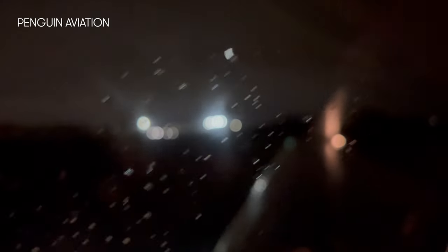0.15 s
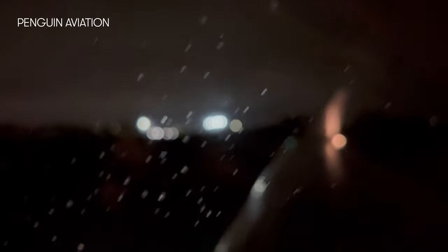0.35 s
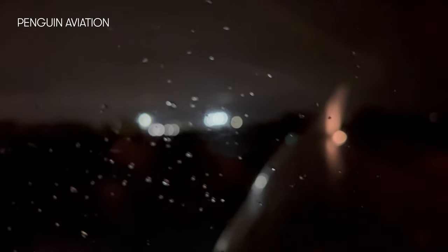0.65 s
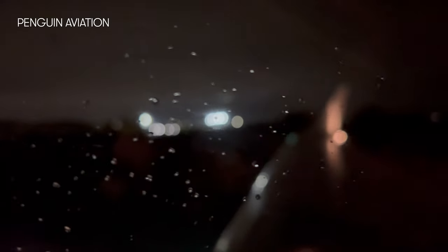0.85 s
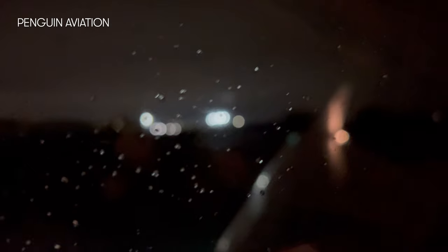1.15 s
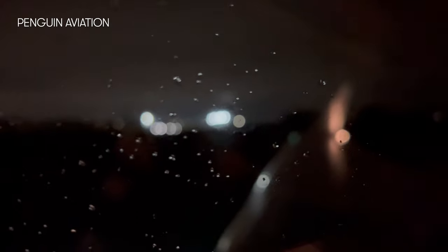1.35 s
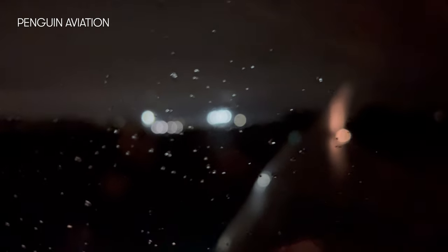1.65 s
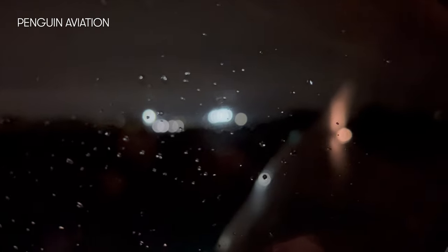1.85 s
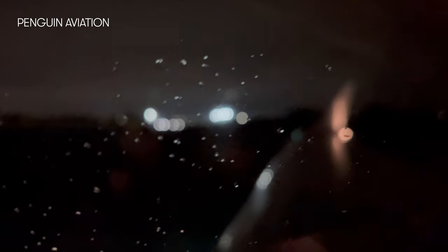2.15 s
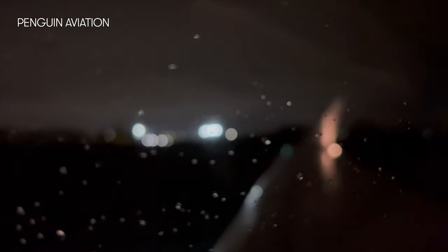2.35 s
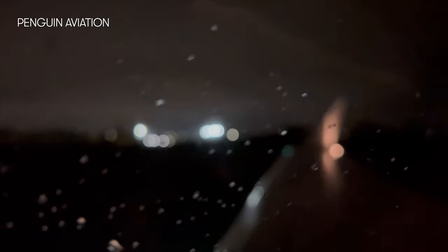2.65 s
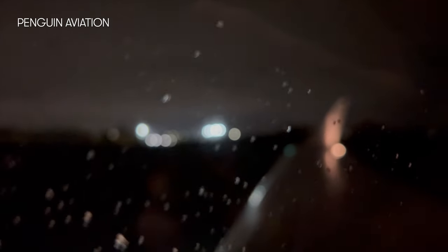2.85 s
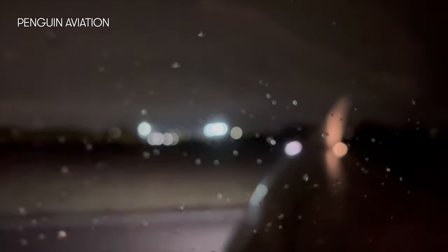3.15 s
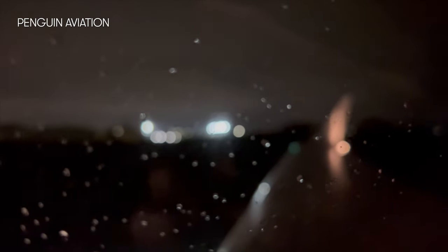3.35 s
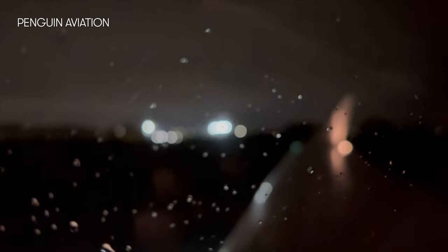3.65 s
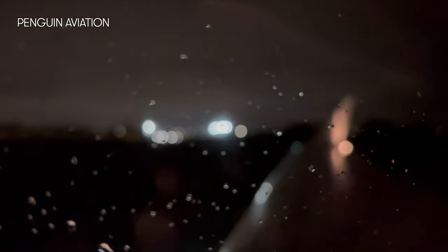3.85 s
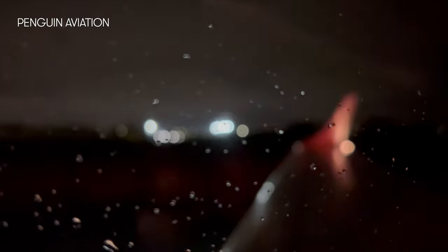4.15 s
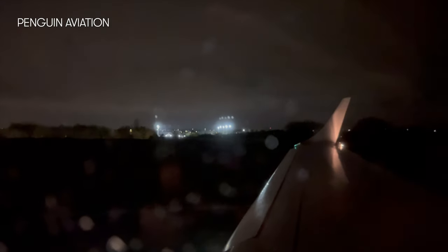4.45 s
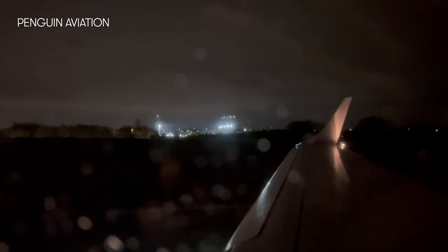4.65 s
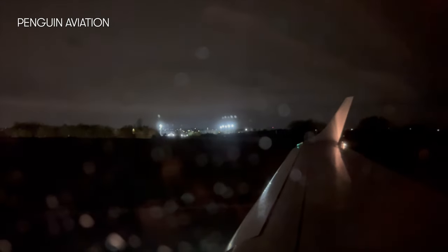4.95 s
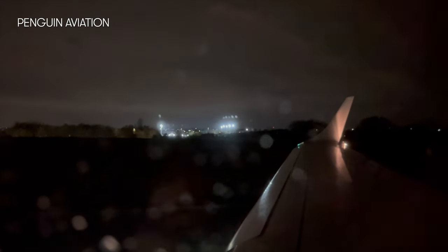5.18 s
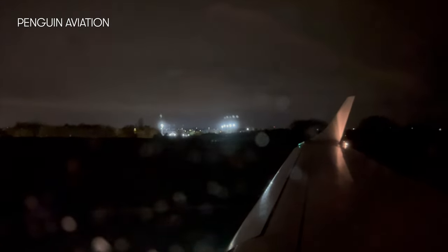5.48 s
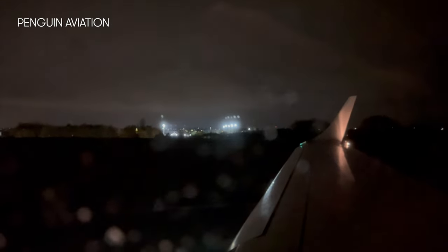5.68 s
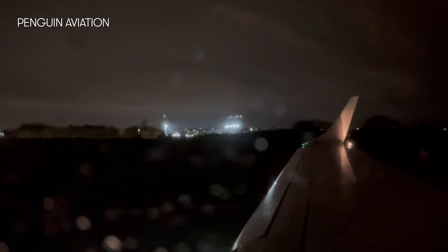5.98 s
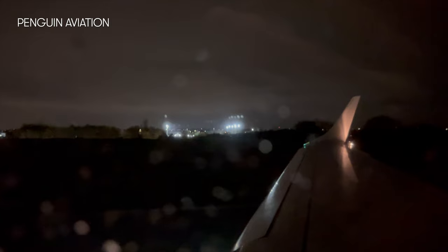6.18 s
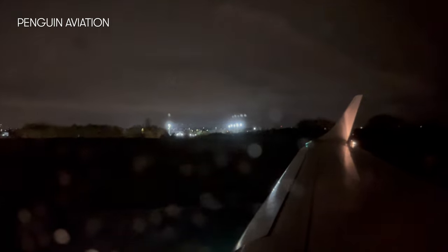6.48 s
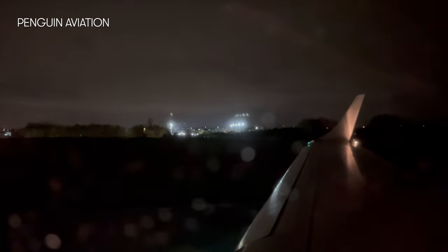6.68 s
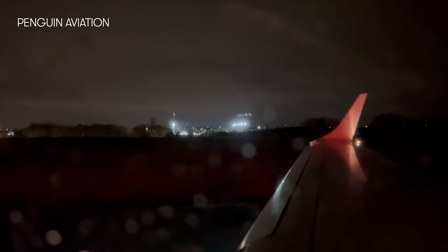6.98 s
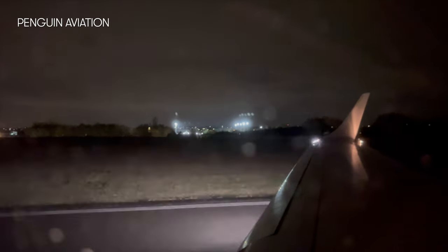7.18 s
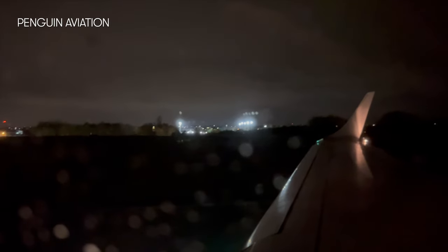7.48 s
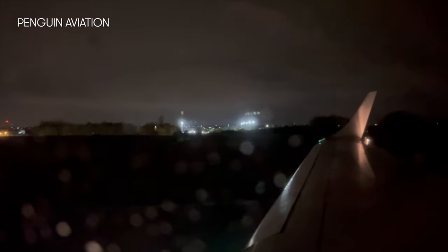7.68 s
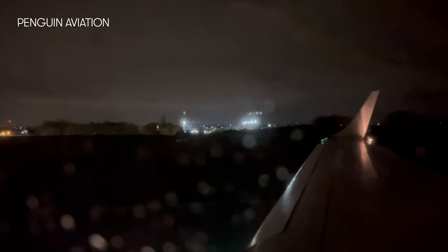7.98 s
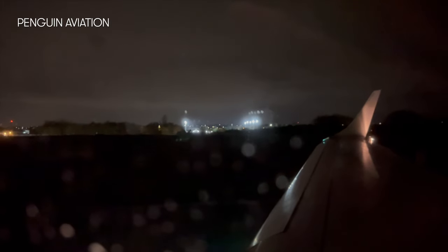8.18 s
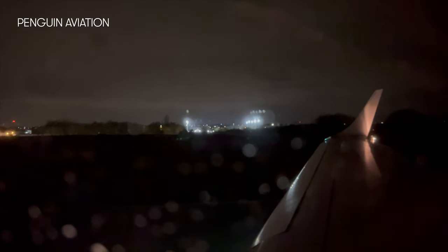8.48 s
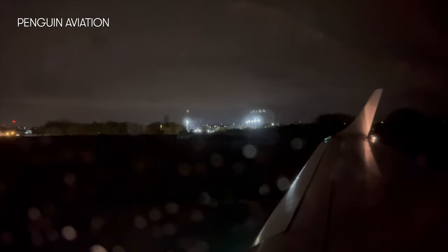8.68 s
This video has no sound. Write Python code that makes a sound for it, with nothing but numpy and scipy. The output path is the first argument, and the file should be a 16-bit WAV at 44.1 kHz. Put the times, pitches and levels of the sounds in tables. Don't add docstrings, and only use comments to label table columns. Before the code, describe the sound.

Inside a jet cabin, a low idling engine hum and roar jump with a click to louder take-off thrust, rising tones and rumbling wheels.

```python
import sys
import numpy as np
from scipy import signal
from scipy.io import wavfile
from scipy.ndimage import uniform_filter1d

SR = 44100
rng = np.random.default_rng(int(sys.argv[2]) if len(sys.argv) > 2 else 0)


def inscribe(sig):
    pcm = np.round(np.clip(np.atleast_2d(sig).T, -1, 1) * 32767)
    wavfile.write(sys.argv[1], SR, pcm.astype(np.int16))


def undo_db(level):
    steps = np.asarray(level, float) / 20
    return 10 ** steps


N = 389403

CHANGE_S = 2.2536
ROLL_START_S, ROLL_END_S = 4.3, 7.46

# time_s, shaft_hz, hum_db
SHAFT_SPEED = [
    [(0, 186.7, -19), (.55, 186.4, -24), (1.3, 186.7, -19), (2.25, 186.7, -19)],
    [(2.26, 194.4, -13), (2.6, 196.8, -14.5), (3.6, 205, -18), (4.2, 209.8, -25), (4.85, 216.2, -25),
     (5.2, 220.2, -41), (5.9, 227.7, -34), (6.1, 231, -35), (6.65, 234.6, -27.5), (6.9, 234, -25),
     (7.3, 230.8, -23), (7.7, 229.4, -24), (8.3, 230.6, -27), (8.83, 232.4, -28)],
]
# multiple_of_shaft, slow_lag_rad, fast_lag_rad (right behind left),
# waver_share, flicker_db
GEARED_TONES = [
    (1, 0.2, .3, 0.00066, 0.74),
    (2.912, 2.12, 0.72, 0.00067, 1.55),
    (5.824, 1.9, 1, 0.00066, 1),
    (5.535, 0.7, 0.77, .0008, 1.0),
]
# middle_s, length_s, top_db
TONE_SWELLS = [
    [(.25, .6, -38.5), (1.0, 1.06, -45.5), (1.95, 1.5, -39), (2.8, 2.2, -44.5), (2.52, 0.18, -42),
     (2.82, 0.2, -35.5), (3.1, .22, -39), (3.4, .2, -47), (3.9, .4, -40), (4.6, .4, -39.5),
     (5.45, .35, -40.5), (5.8, .4, -50), (7.0, 0.93, -54), (7.9, 2.0, -46), (8.7, 1.1, -50)],
    [(.5, .5, -50), (3.0, .4, -59), (4.1, .8, -55.5), (6.9, 0.51, -52), (7.3, .4, -59), (8.7, .7, -53)],
    [(0, 0.69, -49), (.45, .4, -51.5), (.95, 1.4, -47.5), (2.0, .7, -54), (4.0, .6, -55.5),
     (4.65, 1, -55.5), (7.2, .8, -61.5), (8.65, .8, -51.5)],
]
TONE_REST_DB = [-50.5, -64, -63]
# time_s, thrust_db
ENGINE_THRUST = [
    [(0, -0.5), (.45, 2), (.9, -0.3), (2.25, 0.7)],
    [(2.26, 0.5), (2.6, 0), (3.6, 0), (5.3, 0.5), (5.7, 2), (6.25, 4), (6.6, 1.5), (7.4, -2), (7.9, -1),
     (8.55, 0.5), (8.83, 1)],
]
PART_HZ = [60, 150, 360, 950, 3300, 12000]
# share_of_thrust, standstill_db, full_speed_db, lumpy_db
ROAR_PARTS = [
    (.2, -5.5, 1.55, 0.5),
    (0.4, 0.2, -0.66, .5),
    (1.2, 0, .3, 0.2),
    (.3, -1.5, 0.55, 0.2),
    (.4, 1.1, -1.1, .3),
    (.35, 0, 0, 1),
]
IDLE_PART_DB = [-0.63, 0.12, .3, .3, .6, .3]
# pitch_hz, level_db per Hz
SHARED_COLOUR = [
    [(22, -71.5), (35, -57.5), (40, -53), (65, -39.5), (135, -42), (402, -61), (454, -66), (1059, -78.5),
     (1196, -83), (1720, -80.5), (1941, -85), (2791, -86.5), (8300, -105.5), (12500, -104)],
    [(22, -67.5), (65, -35), (94, -41), (152, -37.5), (219, -49.5), (402, -55.5), (512, -64), (2473, -83.5),
     (2791, -78.5), (3151, -86.0), (4014, -86.5), (5773, -96.5), (8800, -102), (12500, -104)],
]
# pitch_hz, level_db per Hz
APART_COLOUR = [
    [(22, -81), (28, -70), (69, -53), (90, -54), (151, -53), (287, -65.5), (480, -68.5), (2553, -90),
     (2903, -88), (6276, -101.2), (6900, -103), (7400, -108), (9000, -104.5), (12000, -107)],
    [(22, -85.5), (32, -80), (132, -52), (195, -58), (621, -65), (803, -70.5), (2553, -84), (3301, -85),
     (4268, -91.5), (5519, -93), (7137, -102.2), (9000, -103), (12000, -106.5), (15000, -108)],
]
# middle_s, length_s, rumble_db
RUNWAY_JOINTS = [
    (2.6, 1.2, 2),
    (4.652, .3, 4.5),
    (5.3, .4, 3),
    (6.1, 0.39, 3.5),
    (6.75, 0.47, 2),
    (7.4, 0.19, 6),
    (8.35, .4, 2.5),
]
# start_s, end_s, pitch_hz, width_hz, level_db
STEADY_WHISTLES = [(6.75, 7.7, 7780, 170, -69.5), (7.3, 8.4, 7830, 260, -73), (5.0, 5.5, 7800, 90, -71),
                   (0, 4.0, 9410, 20, -80.5), (0.5, 4.0, 9795, 20, -82.5), (2, 7.5, 4150, 410, -66),
                   (2.1, 7.3, 2790, 110, -61.5), (4.5, 8.2, 1960, 260, -61), (3.5, 8.0, 6400, 820, -68.5)]
# start_s, end_s, start_hz, end_hz, level_db
GLIDING_WHISTLES = [
    (2.5, 4.4, 2225, 2480, -63.5),
    (3.1, 3.65, 2305, 2360, -59.5),
    (7.4, 8.4, 14350, 13900, -79),
]
# peak_s, rise_s, fall_s, level_db, brightness_db per octave
SLEEVE_BRUSHES = [(.335, .07, 0.25, -46.5, -6.5), (.515, .1, 0.032, -46, -3.5), (.574, .04, .026, -29, 1.5),
                  (.588, .035, .016, -32.5, -3), (1.82, 0.076, .025, -63, 7.5), (1.968, .03, 0.014, -64, 6),
                  (2.503, .018, .055, -51.5, 8), (2.812, .02, .05, -58, 9), (3.23, 0.046, .1, -61, 9)]
# pitch_hz, width_hz, level_db
CLOTH_RESONANCES = [(459, 460, -1), (904, 1900, -4), (1460, 680, 2), (2106, 600, -3), (3310, 1700, -18.5),
                    (4050, 910, -10), (5200, 1200, -18), (6250, 900, -8.5), (8460, 2200, -19.5),
                    (12000, 2800, -22.5), (14300, 2700, -27)]
# middle_s, length_s, level_db
HAND_SHIFTS = [
    (.38, 0.14, -37),
    (0.474, 0.18, -34),
    (.582, .05, -28),
]
# low_edge_hz, high_edge_hz, wander_hz
SHARED_GAPS = [(9000, 9320, 170), (9510, 9730, 82), (9670, 11220, 190), (15250, 17500, 330)]
# low_edge_hz, high_edge_hz, wander_hz
APART_GAPS = [(11650, 15100, 330), (15500, 17500, 300), (7350, 7300, 260)]


def roar(patchy_db=1.24):
    lead_s, link = 20 / 44100, .4
    change = round(CHANGE_S * SR)
    out = []
    for stage, (start, stop) in enumerate([(0, change), (change, N)]):
        noise = rng.standard_normal((2, stop - start))
        hz, t, z = signal.stft(noise, SR, nperseg=4096, noverlap=3072)
        share = np.array([read(list(zip(PART_HZ, row)), hz) for row in np.eye(len(PART_HZ))])
        swell = share.T @ swell_db(t + start / SR, stage)
        patches = uniform_filter1d(rng.standard_normal(z.shape), size=30, axis=1)
        patches = uniform_filter1d(patches, size=3, axis=2)
        colour = np.array([read(SHARED_COLOUR[stage], hz), read(APART_COLOUR[stage], hz)])[..., None]
        linked = link * np.sin(2 * np.pi * hz * lead_s)[:, None]
        z = np.array([z[0], 1j * linked * z[0] + np.sqrt(1 - linked ** 2) * z[1]])
        z = z * undo_db(colour + swell + patchy_db * evened(patches)) * np.sqrt(SR / 2)
        shared, apart = signal.istft(z, nperseg=4096, noverlap=3072)[1][:, :stop - start]
        out.append([shared + apart, shared - apart])
    return np.hstack(out)


def swell_db(t, stage):
    share, still_db, fast_db, lumpy_db = np.transpose(ROAR_PARTS)[..., None]
    speed = np.clip((t - ROLL_START_S) / (ROLL_END_S - ROLL_START_S), 0, 1)
    if stage == 0:
        base = np.array(IDLE_PART_DB)[:, None]
    else:
        base = still_db + (fast_db - still_db) * speed
    lumps = rng.standard_normal((len(ROAR_PARTS), len(t)))
    lumps = evened(uniform_filter1d(lumps, size=8, axis=1))
    bumps = sum(db * hump(t, s, length) for s, length, db in RUNWAY_JOINTS)
    joints = bumps * np.eye(len(ROAR_PARTS))[:, :1]
    return base + share * follow([ENGINE_THRUST[stage]], t)[0] + lumpy_db * lumps + joints


def shafts(slow_hz=224.3, fast_hz=229.7):
    t = np.arange(N) / SR
    hz, hum_db = follow(SHAFT_SPEED, t)
    levels = [undo_db(hum_db)]
    for rest_db, rows in zip(TONE_REST_DB, TONE_SWELLS):
        levels.append(undo_db(rest_db) + sum(undo_db(db) * hump(t, s, length) for s, length, db in rows))
    out = 0
    for (multiple, slow_lag, fast_lag, waver, flicker_db), level in zip(GEARED_TONES, levels):
        pitch_hz = multiple * hz * (1 + waver * drift(12., t))
        angle = 2 * np.pi * (np.cumsum(pitch_hz) / SR + rng.random())
        lag = np.interp(hz, [slow_hz, fast_hz], [slow_lag, fast_lag])
        tone = np.sin(angle + np.array([lag / 2, -lag / 2]))
        out = out + np.sqrt(2) * level * undo_db(flicker_db * drift(15.0, t)) * tone
    return out


def whistles(alike=1.0):
    glide_width = .0075
    rows = [(s0, s1, f0, f1, glide_width * f0, db) for s0, s1, f0, f1, db in GLIDING_WHISTLES]
    rows += [(s0, s1, f, f, w, db) for s0, s1, f, w, db in STEADY_WHISTLES]
    out = np.zeros((2, N))
    for s0, s1, hz0, hz1, width, db in rows:
        a, b = round(s0 * SR), round(s1 * SR)
        both, *own = rng.standard_normal((3, N))[:, a:b]
        air = alike * both + (1 - alike) * np.array(own)
        hz = np.linspace(hz0, hz1, b - a)
        tone = resonate(resonate(air, hz, width), hz, width)
        out[:, a:b] += undo_db(db) * evened(tone) * signal.windows.tukey(b - a, .3)
    return out


def sleeve(alike=0.41, grainy_db=4.0):
    edge_db, roundness = -23, 1.45
    port_db = np.array([[4.6], [6.6]])
    out = np.zeros((2, N))
    for peak, rise, fall, level_db, bright_db in SLEEVE_BRUSHES:
        t = np.arange(peak - rise, peak + fall, 1 / SR)
        distance = np.maximum((peak - t) / rise, (t - peak) / fall)
        db = level_db + edge_db * distance ** roundness
        both, *own = rng.standard_normal((3, SR // 2))[:, :len(t)]
        drag = (alike * both + (1 - alike) * np.array(own)) * undo_db(grainy_db * drift(200., t))
        rub = 0
        for f, w, d in CLOTH_RESONANCES:
            threads = np.roll(drag, int(f), axis=1)
            ring = resonate(resonate(threads, f, w), f, w)
            rub = rub + undo_db(d + bright_db * np.log2(f / 3000)) * ring * np.sqrt(1000 / w)
        a = round(t[0] * SR)
        out[:, a:a + len(t)] += undo_db(db + port_db) * evened(rub) * signal.windows.tukey(len(t), .3)
    return out


def grip():
    rub_hz, rub_width_hz = 260, 380
    scrape_hz, scrape_width_hz, scrape_db = 1750, 450, -15
    t = np.arange(SR) / SR
    rub = evened(resonate(rng.standard_normal(SR), rub_hz, rub_width_hz)) * np.array([[1], [-1]])
    scrape = resonate(rng.standard_normal(SR), scrape_hz, scrape_width_hz)
    scrape = undo_db(scrape_db) * evened(resonate(scrape, scrape_hz, scrape_width_hz))
    strength = sum(undo_db(db) * hump(t, s, length) for s, length, db in HAND_SHIFTS)
    return np.pad((rub + scrape) * strength, ((0, 0), (0, N - SR)))


def knock():
    start_s, pitch_hz, fade_60db_s, level_db = .5795, 400, .03, -13
    since = np.maximum(np.arange(N) / SR - start_s, 0)
    return undo_db(level_db - 60 * since / fade_60db_s) * np.sin(2 * np.pi * pitch_hz * since)


def evened(x):
    return x / np.sqrt(np.mean(x ** 2) + 1e-20)


def read(points, hz):
    f, value = np.transpose(points)
    return np.interp(np.log(hz + 1), np.log(f + 1), value)


def follow(tables, t):
    s, *columns = np.concatenate(tables).T
    return [np.interp(t, s, c) for c in columns]


def hump(t, middle, length):
    return np.cos(np.pi * np.clip((t - middle) / length, -.5, .5)) ** 2


def drift(top_hz, t):
    coarse = t[::16]
    wave = 0
    for f in np.geomspace(top_hz / 20, top_hz, num=20):
        wave = wave + np.sin(2 * np.pi * (f * coarse + rng.random())) / np.sqrt(f)
    return np.interp(t, coarse, evened(wave))


def resonate(x, hz, width):
    turn = np.exp(2j * np.pi * np.cumsum(hz * np.ones(x.shape[-1])) / SR)
    r = np.exp(-np.pi * width / SR)
    return 2 * (turn * signal.lfilter([1 - r], [1, -r], x / turn + 1e-18)).real


def scene():
    return roar() + shafts() + whistles() + sleeve() + knock() + grip()


def emptied(sound, gaps, hold=.85, step_hz=171.0, weak=.55, weak_hz=9000.):
    hz, t, z = signal.stft(sound, SR, nperseg=1024, noverlap=768)
    power = abs(z) ** 2
    limit = weak * np.clip(hz / weak_hz, 0, 1)[:, None] ** 2
    z = z * (power > limit * uniform_filter1d(power, size=16, axis=0))
    for low, high, wander in gaps:
        jump = rng.standard_normal((2, len(t)))
        fresh = rng.random((2, len(t))) > hold
        last_jump = np.maximum.accumulate(np.arange(len(t)) * fresh, axis=1)
        held = np.take_along_axis(jump, last_jump, axis=1)
        edges = np.array([[low], [high]]) + step_hz * np.round(wander * held / step_hz)
        z = z * ((hz[:, None] < edges[0]) | (hz[:, None] > edges[1]))
    return signal.istft(z, SR, nperseg=1024, noverlap=768)[1][:N]


def low_pass(x):
    return signal.sosfilt(signal.butter(12, 15940, fs=SR, output="sos"), x)


def record(dry):
    shared = emptied(dry.mean(0), SHARED_GAPS)
    apart = emptied((dry[0] - dry[1]) / 2, APART_GAPS)
    step_height, edge_s, fade_s = .31, .00001, .002
    since = np.arange(N) / SR - CHANGE_S
    click = step_height / 2 * np.tanh(since / edge_s) * np.exp(-abs(since) / fade_s)
    return low_pass(np.array([shared + apart, shared - apart]) + click)


dry = scene()
out = record(dry)
inscribe(out)
```